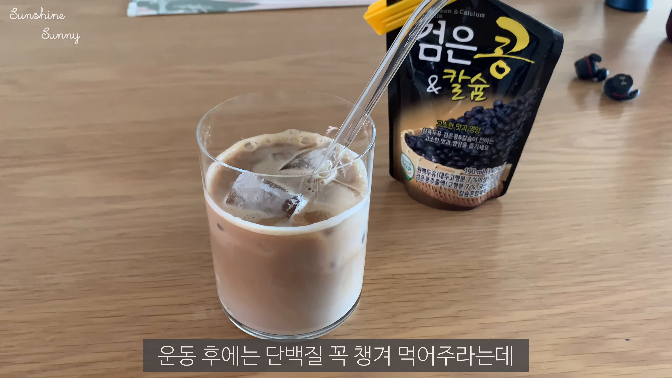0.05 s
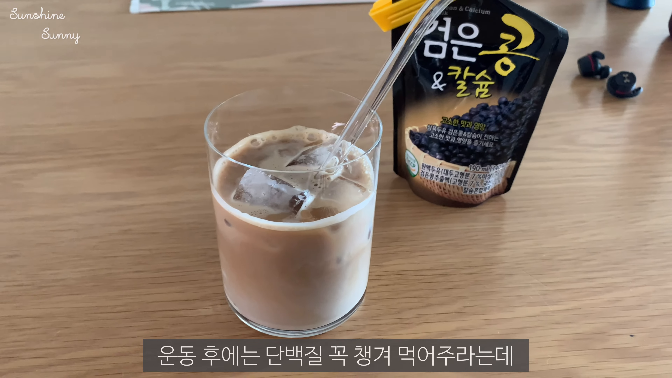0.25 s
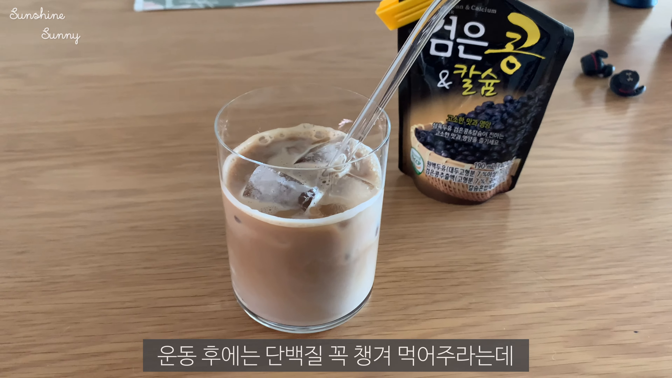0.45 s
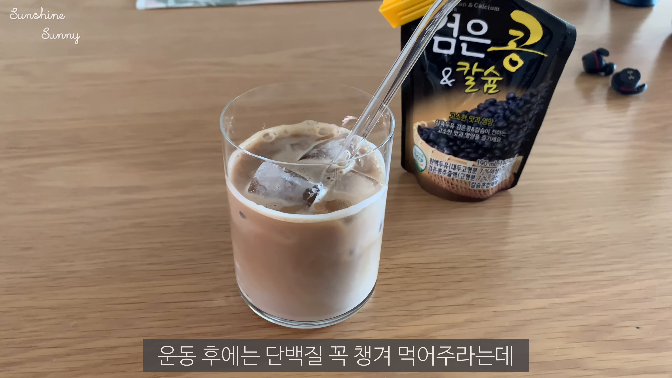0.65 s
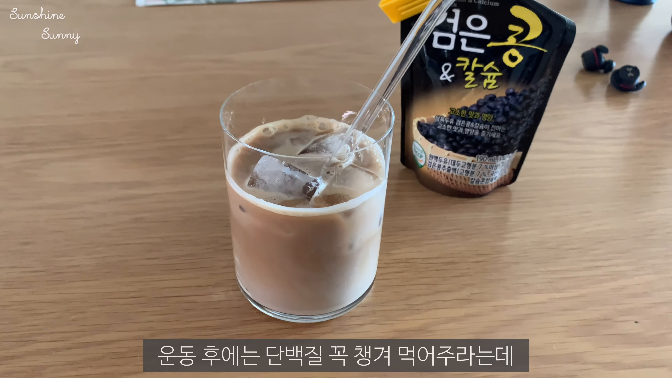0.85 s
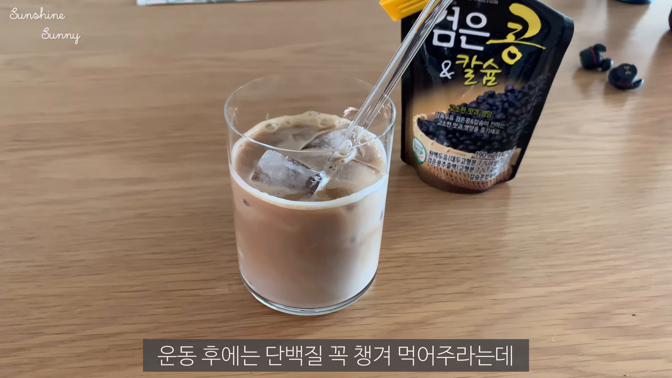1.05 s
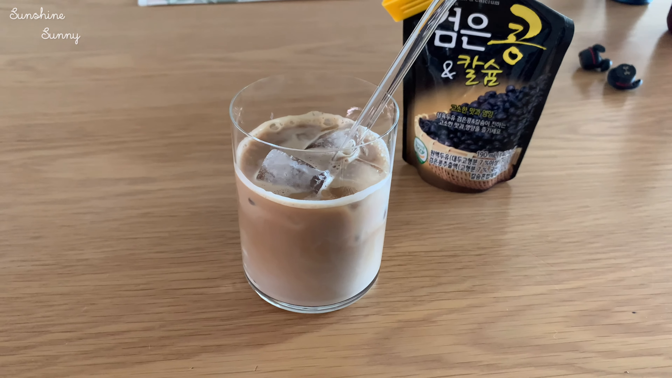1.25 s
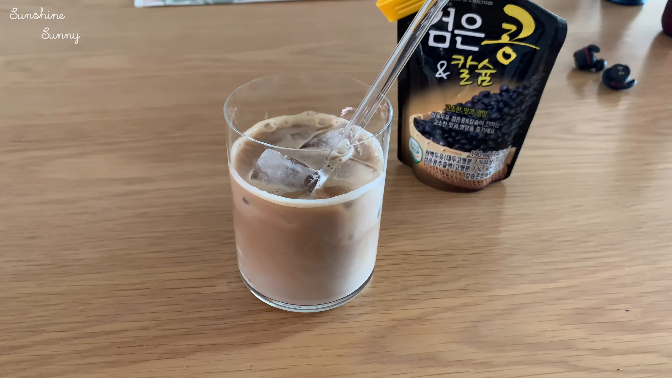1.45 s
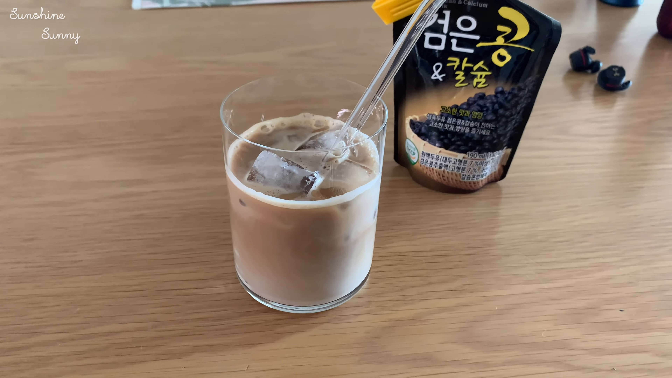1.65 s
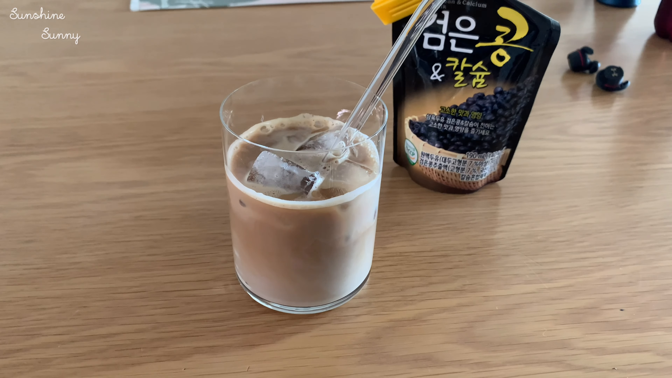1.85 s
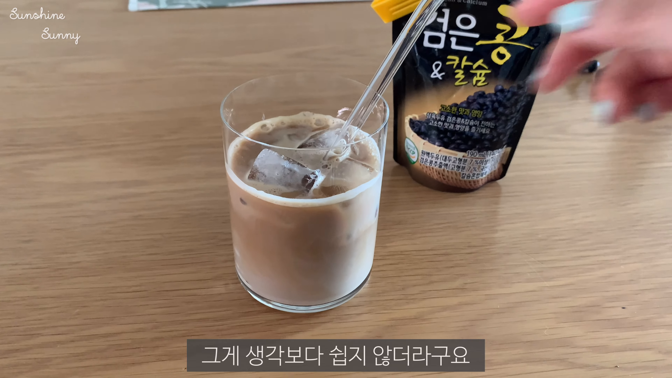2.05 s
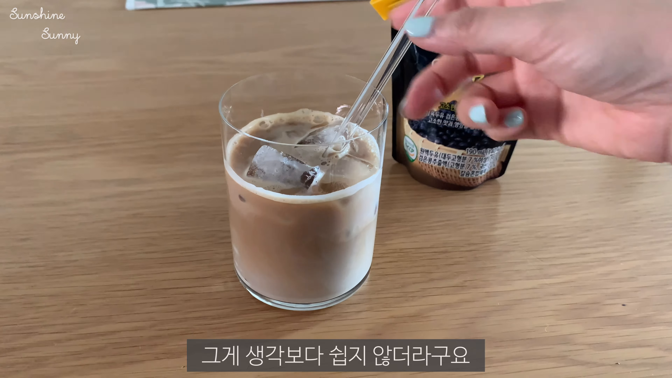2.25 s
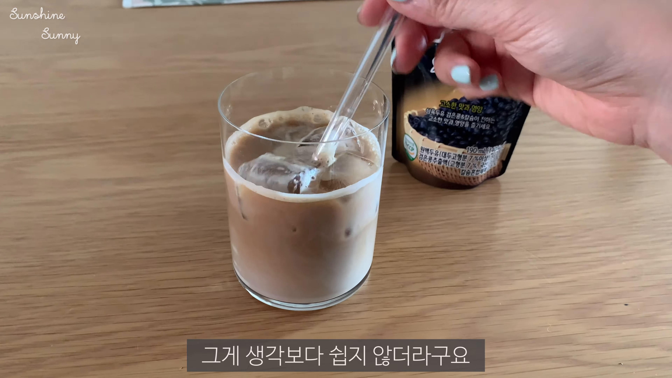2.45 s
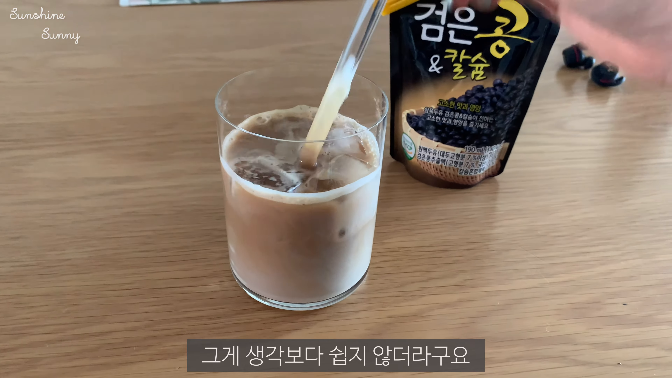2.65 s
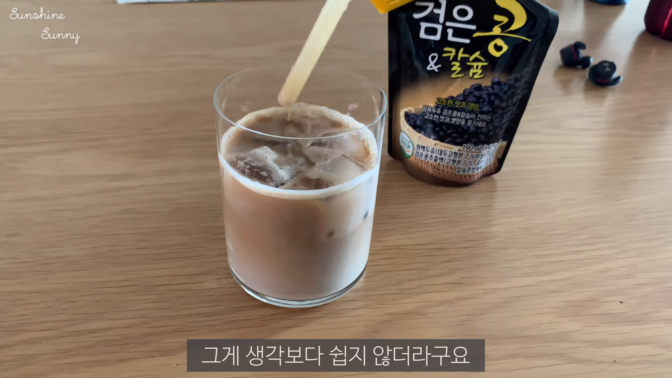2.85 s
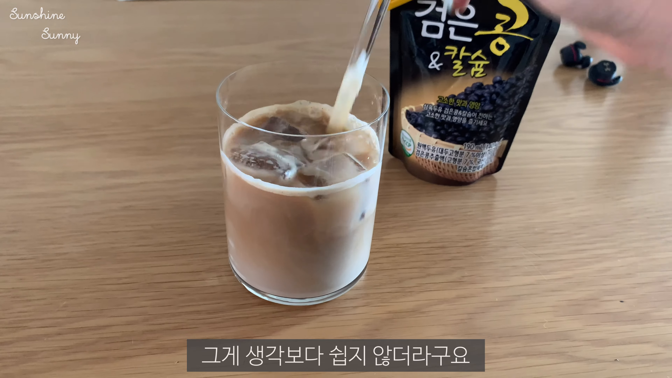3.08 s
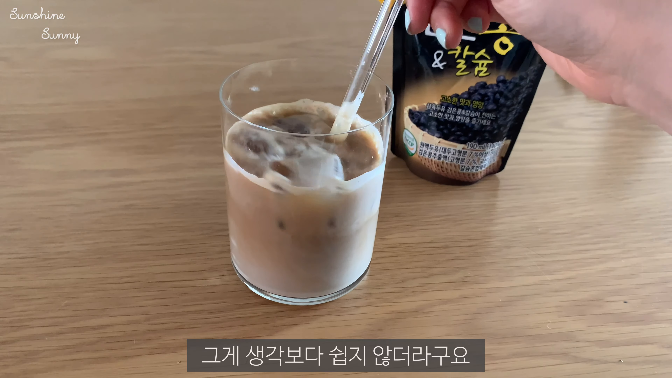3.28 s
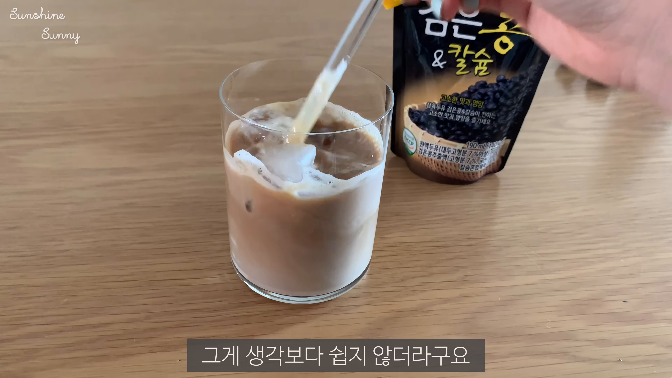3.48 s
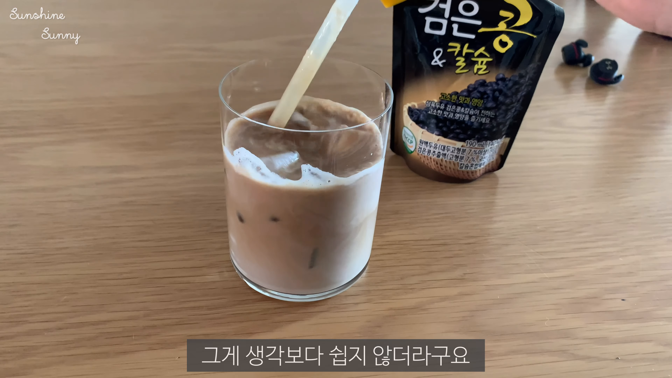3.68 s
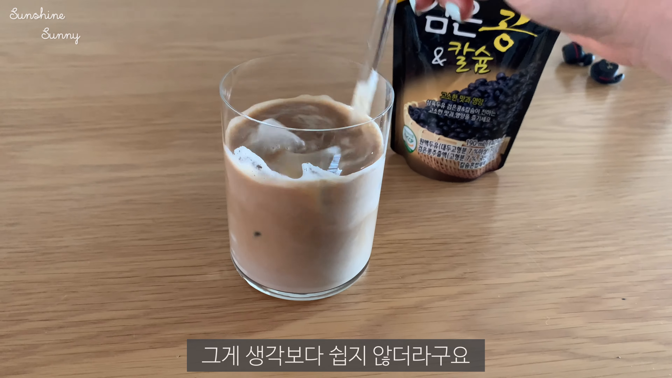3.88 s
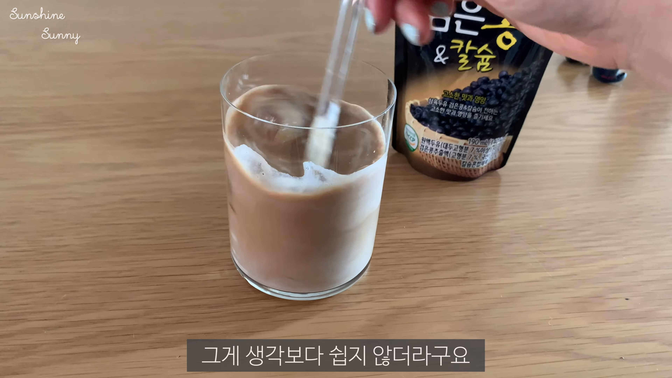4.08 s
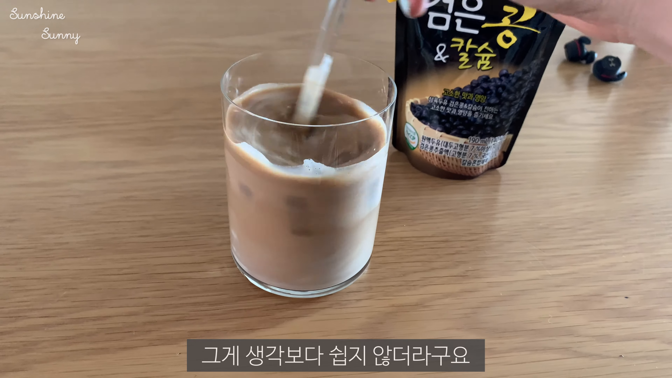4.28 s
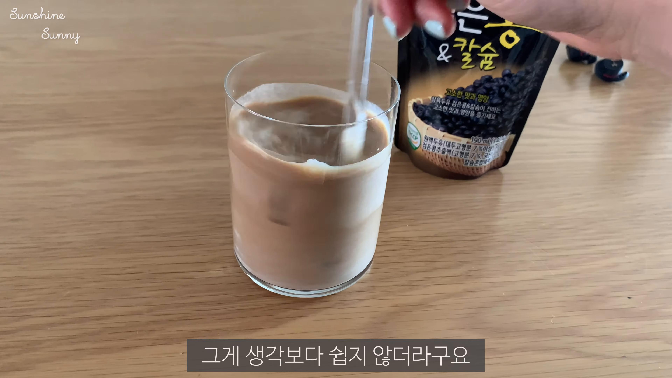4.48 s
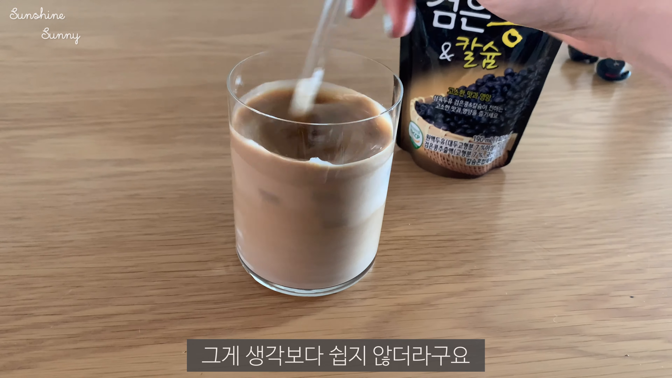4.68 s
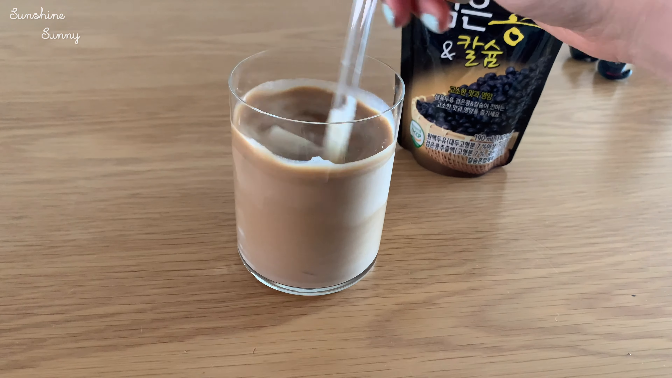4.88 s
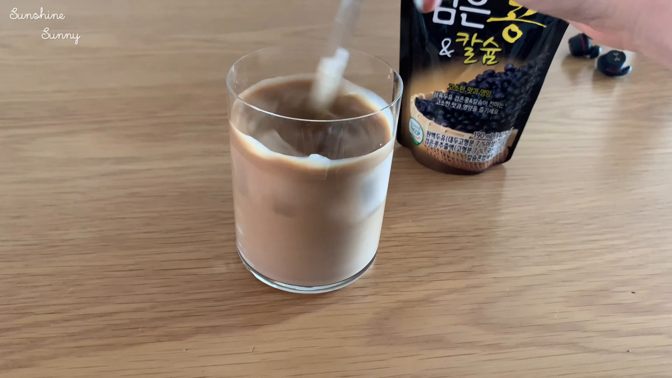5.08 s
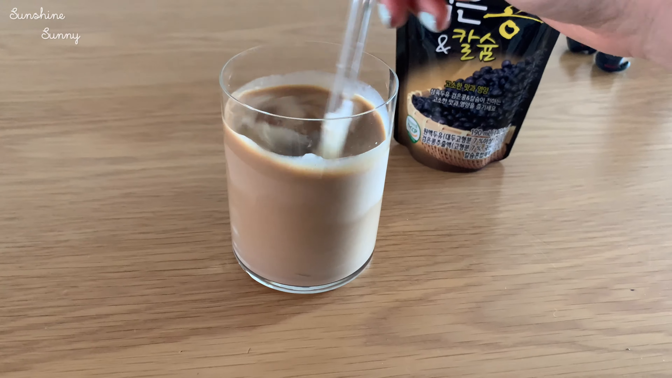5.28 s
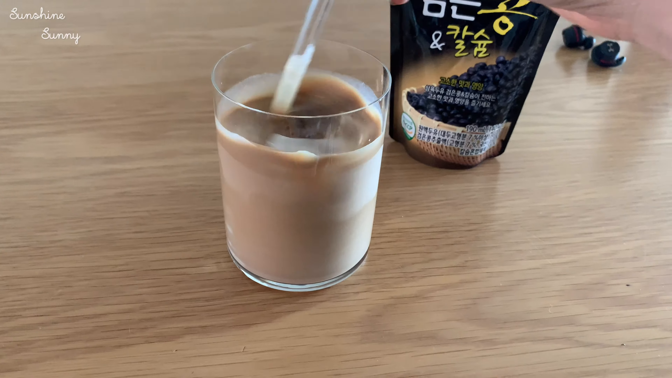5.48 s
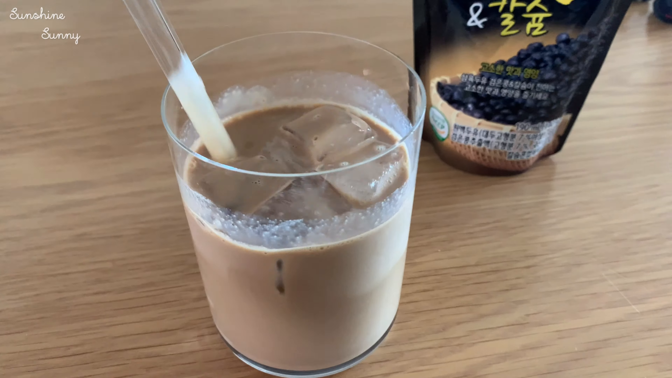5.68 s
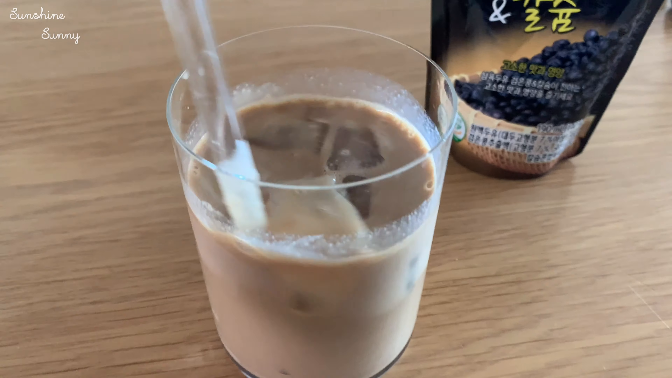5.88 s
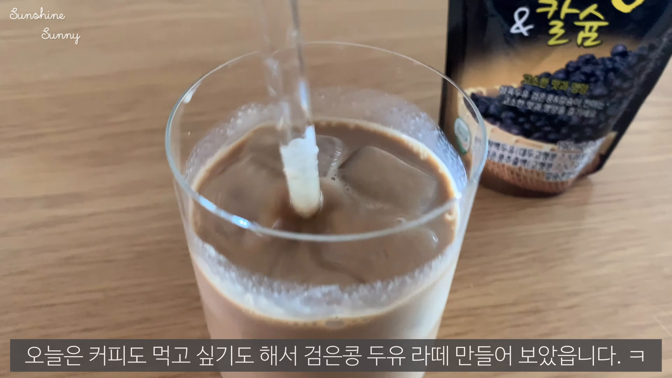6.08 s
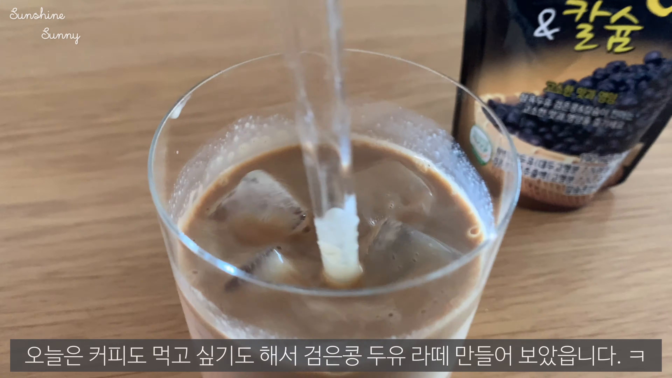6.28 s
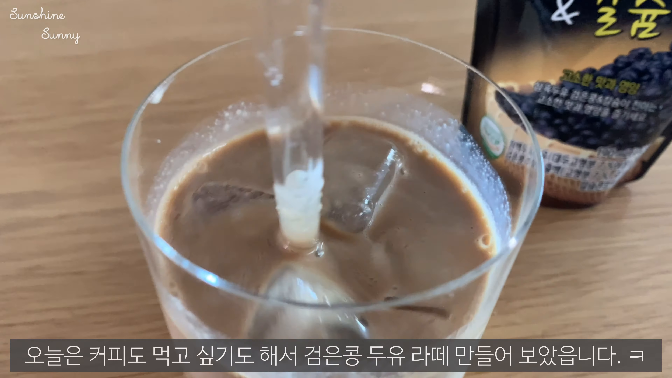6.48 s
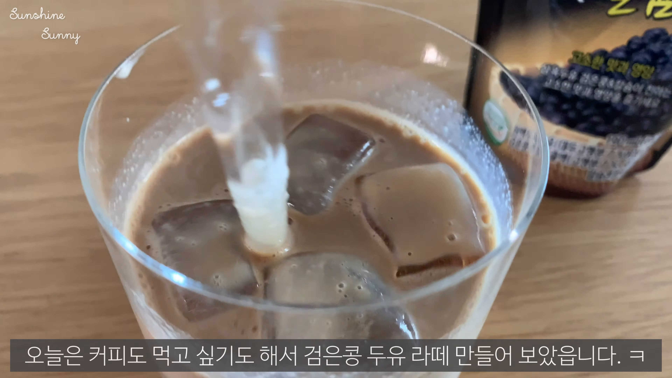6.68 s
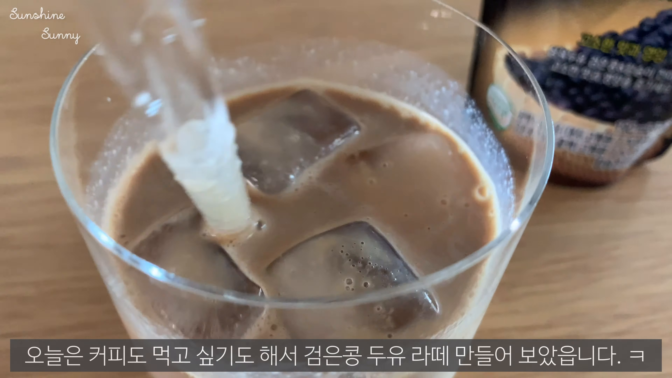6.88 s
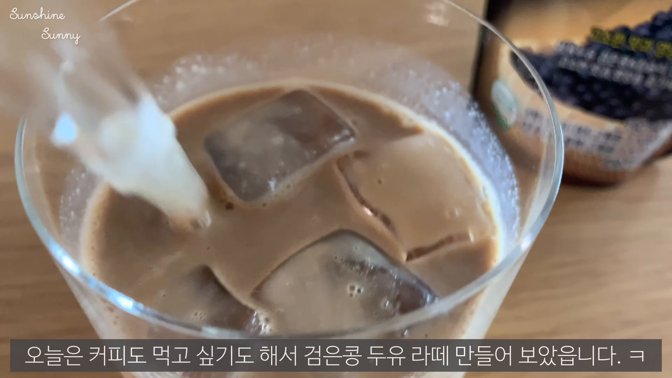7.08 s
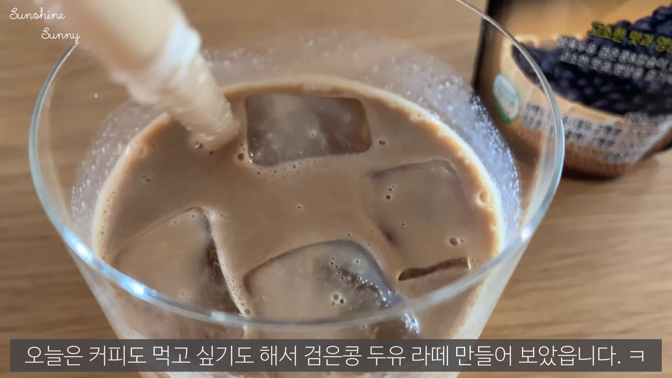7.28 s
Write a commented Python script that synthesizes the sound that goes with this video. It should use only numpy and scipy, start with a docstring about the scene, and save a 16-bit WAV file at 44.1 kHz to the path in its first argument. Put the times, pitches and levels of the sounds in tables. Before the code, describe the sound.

Ice cubes clack and rattle against a thin glass tumbler of iced milk coffee as a glass straw stirs it, after two quiet seconds.

```python
"""Ice cubes in stirred milk coffee clack against each other and a thin tumbler: short damped modes and a crack.
The full glass answers with low damped tones, shoves sound the wooden table, the glass straw rings on.
The drink washes (coloured noise), ticks and gulps (sliding damped sines).
A hand-held stereo microphone hears it close by, with soft hand bumps, kitchen reflections and a low hum."""
import sys
import numpy as np
from scipy import signal
from scipy.fft import rfft, irfft
from scipy.io import wavfile

SR = 44100
rng = np.random.default_rng(int(sys.argv[2]) if len(sys.argv) > 2 else 0)


def transcribe(signal):
    """Save signal, clipped to [-1, 1], as a 16-bit WAV file at the path in sys.argv[1]."""
    frames = np.atleast_2d(signal).T
    limited = np.clip(frames, -1, 1)
    pcm = np.round(limited * 32767).astype(np.int16)
    wavfile.write(sys.argv[1], SR, pcm)


N = 323694
TIME = np.arange(N) / SR

# contacts of ice, straw and glass: t/s, strength/dB, hardness/dB (>0 corner, <0 wet face), clack f/Hz
CONTACTS = [(2.2864, -47.5, 4, 4710), (2.304, -48, 0, 4860), (2.3345, -53, 2, 4730),
            (2.3908, -56.5, -2.5, 4680), (2.4643, -42.5, 2.5, 4540), (2.532, -43.5, 1.5, 4440),
            (2.597, -42.5, 0.5, 4140), (2.828, -52.5, -0.5, 3860), (2.9238, -44.5, 0, 4060),
            (2.9478, -45.5, -4, 4180), (3.053, -37, 7.5, 4400), (3.1481, -21, 6.5, 5020),
            (3.2384, -27, 2, 2335), (3.2507, -30, 0, 2500), (3.272, -43.5, 9, 4470),
            (3.283, -42, 0.5, 4400), (3.332, -45.5, 6.5, 4530), (3.3897, -28.5, 2, 4520),
            (3.4222, -29.5, -1.5, 4240), (3.4347, -30.5, 13, 4140), (3.546, -40.5, 7, 2890),
            (3.689, -42.5, 4, 4800), (3.75, -25, 11, 3850), (3.7595, -29.5, 10, 5320),
            (3.8176, -42.5, 3, 4230), (3.8336, -36, 2.5, 4160), (3.905, -42, -4, 5250),
            (3.9562, -39.5, -8, 2180), (3.965, -37.5, -3.5, 2840), (4.045, -39, -4, 4820),
            (4.085, -34.5, 0, 2390), (4.1391, -44, -2.5, 2980), (4.1937, -44.5, -2, 3670),
            (4.266, -44, -6, 2200), (4.3301, -29, 6.5, 3030), (4.3471, -28, 9, 4490),
            (4.3926, -37, -1.5, 2440), (4.4135, -35, 2, 4940), (4.4273, -34, -5, 3640),
            (4.5536, -48.5, -6, 2430), (4.632, -46, -2, 4560), (4.712, -45, -4, 2550),
            (4.7482, -26, -2.5, 3300), (4.81, -32, -5.5, 2620), (4.821, -25.5, 6, 3680),
            (4.8392, -30.5, -2, 3520), (4.848, -34, -0.5, 4730), (4.865, -43, -0.5, 3410),
            (4.946, -38, -4, 4770), (4.959, -42, -4, 3260), (4.9911, -38, -3.5, 4530),
            (5.0729, -20, 6.5, 3400), (5.1045, -33, 12.5, 4880), (5.1868, -30, -4, 2500),
            (5.2264, -29.5, 9.5, 5200), (5.2408, -33.5, 7.5, 5000), (5.3385, -33.5, 0.5, 4430),
            (5.3701, -30.5, -1.5, 4600), (5.4551, -41, 0, 4830), (5.547, -41, 3.5, 3640),
            (5.6352, -38.5, 6.5, 4300), (5.7359, -39, -2, 4600), (5.7963, -43, 0, 6230),
            (5.8329, -35, 11, 5360), (5.9698, -55, -5, 3960), (6.092, -30.5, 4, 3490),
            (6.1142, -36.5, 1, 3380), (6.1524, -33.5, -4.5, 3230), (6.1657, -36.5, 0, 3180),
            (6.201, -26, 2, 4800), (6.3066, -31.5, 1, 3070), (6.3599, -37, 1, 4440),
            (6.4435, -44, -1, 3000), (6.4712, -36.5, -1, 3124), (6.5233, -46.5, 2.5, 3120),
            (6.5909, -56.5, -0.5, 3070), (6.6418, -50.5, -4, 2810), (6.6745, -57.5, -2, 2440),
            (6.77, -50, -3, 2800), (6.8438, -55, -2.5, 3040), (6.89, -52.5, -4.5, 2530),
            (6.9873, -55.5, -4.5, 2740), (7.0907, -56, 0, 2810), (7.159, -34, 4.5, 3355),
            (7.256, -50, -4.5, 2860), (7.3007, -48.5, 5.5, 4230)]
# low modes of the filled tumbler: f/Hz, level/dB, t60/s
TUMBLER_MODES = [(509.8, 2.5, 0.24), (644.6, 1.5, 0.22), (686.7, 0.5, 0.22), (799.5, -2.5, 0.13)]

# answers to a contact: level/dB at USUAL_DB and hardness 0, dB per dB of strength, dB per dB of hardness
CUBE_LAW, CRACK_LAW, KNOCK_LAW, HOLLOW_LAW = (-34, 1.0, 0.088), (-41.5, 1.03, 1), (-35.5, 0.98, -1.4), (-40.5, 0.62, -0.61)
USUAL_DB = -35  # strength of an ordinary contact
LEAD_S = 0.012  # grazing time ahead of the main touch


def from_db(db):
    """Amplitude gain."""
    return 10 ** (np.asarray(db) / 20)


def rms_one(x):
    """Scales to rms 1."""
    return x / np.sqrt(np.mean(x ** 2) + 1e-20)


def unit_blow(x):
    """Scales a stereo sound to the energy of 10 ms at rms 1."""
    return x / np.sqrt(np.sum(x ** 2) / 2 / (SR / 100) + 1e-20)


def curve(rows, s):
    """Interpolates (t/s, value) rows."""
    return np.interp(s, *np.transpose(rows))


def curves(rows, s):
    """Interpolates every column after t/s."""
    when, *columns = np.transpose(rows)
    return [np.interp(s, when, column) for column in columns]


def filtered(x, hz, kind, order=2):
    """Butterworth filter."""
    sos = signal.butter(order, np.minimum(hz, 0.45 * SR), kind, fs=SR, output="sos")
    return signal.sosfilt(sos, x)


def slow(hz):
    """Low-passed noise of rms 1, past its start-up."""
    return rms_one(filtered(rng.normal(size=N + SR), hz, "low")[SR:])


def strata(count):
    """One random position in each of count equal steps of 0..1."""
    return (np.arange(count) + rng.random(count)) / count


def coloured_noise(spectrum):
    """Stereo noise of rms 1, alike at both ports in the bass."""
    hz = np.maximum(np.fft.rfftfreq(N, 1 / SR), 1)
    points_hz, points_db = np.transpose(spectrum)
    gain = from_db(np.interp(np.log(hz), np.log(points_hz), points_db))
    mid, side = rfft(rng.normal(size=(2, N))) * gain
    return rms_one(irfft(mid + side * hz / (hz + 400) * [[1], [-1]], N))


def add(out, s, sound):
    """Places a stereo sound; it reaches the right port a little later."""
    # microphone moves in over the rim: t/s, lag of the right port/ms
    port_lag = [(5.4, .135), (6.0, .31)]
    for channel, lag_s in enumerate([0, curve(port_lag, s) / 1000]):
        start = int((s + lag_s) * SR)
        part = sound[channel, :max(N - start, 0)]
        out[channel, start:start + len(part)] += part


def mixed(parts):
    """Sums short stereo sounds given as (delay s, gain, sound)."""
    starts = [int(s * SR) for s, _, _ in parts]
    length = max(start + part[2].shape[1] for start, part in zip(starts, parts))
    out = np.zeros((2, length))
    for start, (_, gain, sound) in zip(starts, parts):
        out[:, start:start + sound.shape[1]] += gain * sound
    return out


def ring(hz, db, t60, vary_db, apart):
    """Damped sines, reweighted each blow; each port hears its own strengths and phases."""
    hz, db, t60 = np.atleast_1d(hz, db, t60)
    t = TIME[:int(np.max(t60) * SR)]
    gain = from_db(db + vary_db * rng.normal(size=len(hz))) * rng.choice([-1, 1], len(hz))
    log_strength = 0.5 * rng.normal(size=(2, len(hz)))
    phase = rng.normal(size=(2, len(hz)))
    ports = gain * np.exp(apart * (log_strength + 1j * phase))
    waves = np.exp(np.outer(2j * np.pi * hz - np.log(1000) / t60, t))
    onset = 1 - np.exp(-np.outer(2 * np.pi * hz, t))
    return unit_blow((ports @ (waves * onset)).imag)


def cluster(hz, octaves, t60, falloff_db, count, apart):
    """Damped modes scattered round a pitch, weaker the farther off they lie."""
    offset = strata(count) * 2 - 1
    mode_hz = hz * 2 ** (octaves * offset)
    return ring(mode_hz, -falloff_db * abs(offset), np.full(count, t60), vary_db=1.0, apart=apart)


def blips(rows, glide):
    """Single damped tones whose pitch slides up as they die."""
    out = np.zeros((2, N))
    for s, hz, db, t60 in rows:
        t = TIME[:int(t60 * SR)]
        tone = np.sin(2 * np.pi * hz * t * (1 + glide * t / t60))
        tone = tone * from_db(-60 * t / t60) * (1 - np.exp(-4 * hz * t))
        add(out, s, from_db(db) * unit_blow(np.array([tone, tone])))
    return out


def background(air_db=-64, hum_hz=56.9, hum_start_db=-58.5, hum_rise_db=2.9, waver=0.32, swell_db=2):
    """A wavering hum, rising from 2.5 to 3.5 s, and dull room air whose rumble swells slowly."""
    # quiet of the kitchen: f/Hz, level/dB per Hz
    air_spectrum = [(25, -19), (60, 5.5), (95, -2), (170, -1.5), (400, -14), (700, -18), (1000, -27.5),
                    (2500, -37), (8000, -42.5), (10500, -36.5), (14000, -47), (15000, -57.5)]
    air = coloured_noise(air_spectrum)
    rumble = filtered(air, 590, "low", order=1)
    air = air + (from_db(swell_db * slow(0.56)) - 1) * rumble
    hum = np.sin(2 * np.pi * hum_hz * TIME + waver * slow(3.6))
    hum = rms_one((1 + waver * slow(9.7)) * hum)
    hum_db = hum_start_db + hum_rise_db * np.clip(TIME - 2.5, 0, 1)
    return from_db(air_db) * air + from_db(hum_db) * hum


def bumps(octaves=0.7, falloff_db=9):
    """The hand shifts on the microphone: dull thuds that swell over a few cycles, without a clear pitch."""
    # soft bumps: t/s, f/Hz, level/dB, t60/s
    bump_rows = [(.6, 206, -49.5, 0.24), (0.679, 135.5, -49, 0.58), (1.13, 228.5, -55, .25),
                 (1.186, 82, -39, 0.08), (1.255, 69.6, -48, 0.055), (5.863, 66.4, -35, 0.16),
                 (6.569, 67.5, -44.5, 0.27)]
    out = np.zeros((2, N))
    for s, hz, db, t60 in bump_rows:
        thud = cluster(hz, octaves, t60, falloff_db, count=7, apart=0.091)
        swell = 1 - np.exp(-TIME[:thud.shape[1]] * hz / 10)
        add(out, s, from_db(db) * unit_blow(thud * swell))
    return out


def kitchen(x, t60=0.18, treble_t60=0.35, early_db=-12, early_t60=0.01, tail_db=-12, treble_db=-17):
    """Quick reflections from the table top and things on it, then the tail of a small room."""
    t = TIME[:SR // 2]

    def echoes(band_hz, decay_s):
        """Decaying noise after a 3 ms gap, in one band."""
        noise = rng.normal(size=(2, len(t))) * from_db(-60 * t / decay_s) * (t > 0.003)
        return filtered(noise / np.sqrt(np.sum(noise ** 2) / 2), band_hz, "band")

    response = (from_db(early_db) * echoes([500, 12000], early_t60)
                + from_db(tail_db) * echoes([120, 5500], t60)
                + from_db(treble_db) * echoes([5500, 12000], treble_t60))
    return signal.fftconvolve(x, response, axes=1)[:, :N]


def gurgle(start_s, length_s=0.12, low_hz=170, high_hz=380, db=-51.0, t60=0.059, count=12):
    """A gulp breaks into a short run of small air pockets."""
    when, pitch = rng.random((2, count))
    hz = low_hz * (high_hz / low_hz) ** pitch
    return blips([(start_s + length_s * w, f, db, t60) for w, f in zip(when, hz)], glide=0.055)


def gulps():
    """Air pockets in the drink sound as sliding damped tones; the first one gurgles."""
    # air pockets: t/s, f/Hz, level/dB, t60/s
    pockets = [(4.197, 166, -36, 0.12), (4.232, 312, -47.5, 0.056), (4.275, 189, -39.5, 0.14),
               (7.052, 418, -33, 0.022)]
    return blips(pockets, glide=0.027) + gurgle(pockets[0][0])


def answer(law, db, hardness):
    """Gain: strong, hard contacts are brief and feed the treble; soft ones push the wall and whole glass."""
    usual_db, per_strength, per_hardness = law
    return from_db(usual_db + per_strength * (db - USUAL_DB) + per_hardness * hardness)


def inside_glass(sound, bounce_s=0.00035, apart=0.2):
    """Sound bounces across the tumbler for a millisecond or two on its way out, equally loud at both ports."""
    t = TIME[:SR // 300]
    paths = rng.normal(size=len(t)) + apart * rng.normal(size=(2, len(t)))
    out = signal.fftconvolve(sound, paths * t * np.exp(-t / bounce_s), axes=1)
    return unit_blow(out / out.std(axis=1, keepdims=True))


def cube(hz, others_db, t60=0.019, detune=0.025):
    """A cube clacks with one leading pitch and wakes the upper modes of the wall, differently at each spot."""
    # upper modes of the glass wall: f/Hz, level/dB
    wall_modes = [(3100, 1), (3400, 3.5), (4020, 1.5), (4560, 5), (4950, -1), (6500, -7)]
    wall_hz, wall_db = np.transpose(wall_modes)
    wall_hz = wall_hz * (1 + detune * rng.normal(size=len(wall_hz)))
    wall = inside_glass(ring(wall_hz, wall_db, np.full(len(wall_hz), t60), vary_db=6.5, apart=0.56))
    lead = cluster(hz, octaves=0.11, t60=0.011, falloff_db=8, count=3, apart=0.72)
    return unit_blow(mixed([(0, 0.86, lead), (0, from_db(others_db), wall)]))


def crack(s, octaves=0.75, low_ratio=0.66, high_ratio=1.21):
    """The hard instant of contact: many high modes that die at once."""
    # duller from over the rim: t/s, centre f/Hz
    crack_pitch = [(3.3, 10830), (6.2, 9240)]
    hz = curve(crack_pitch, s)
    high = cluster(hz, octaves, t60=0.0067, falloff_db=1.0, count=24, apart=0.78)
    return unit_blow(filtered(inside_glass(high), [hz * low_ratio, hz * high_ratio], "band"))


def knock(s):
    """The wall, damped by the drink, gives a short knock; the longer it rings, the purer its pitch."""
    # shifts with the drink, rings longer as the stirring eases: t/s, f/Hz, t60/s
    knock_pitch = [(2.5, 1830, 0.042), (3.3, 1519, 0.045), (3.95, 1950, 0.034), (4.45, 1712, .044),
                   (5.2, 1598, .055), (5.701, 1363, 0.098)]
    hz, t60 = curves(knock_pitch, s)
    wall = cluster(hz, octaves=0.0241 / t60, t60=t60, falloff_db=8.0, count=6, apart=0.58)
    return unit_blow(filtered(wall, [900, 3000], "band"))


def touch(s, db, hardness, hz, side_modes_db=-0.5, spread_per_db=0.27):
    """Gains and sounds of clack, crack and knock; stronger blows wake more of the wall's upper modes."""
    clack = cube(hz, others_db=side_modes_db + spread_per_db * (db - USUAL_DB))
    parts = [(CUBE_LAW, clack), (CRACK_LAW, crack(s)), (KNOCK_LAW, knock(s))]
    return [(answer(law, db, hardness), sound) for law, sound in parts]


def unrest(stir_start_s=2.29, upset_db=-8.5, calm_t60_s=0.34):
    """How much the drink moves: the circling straw plus the dying upset of every knock on the wall."""
    # stirring effort: t/s, level/dB
    stir = [(2.4, -58.5), (2.72, -56), (2.78, -68.5), (3.1, -54.5), (3.3, -42.5), (3.65, -49.5), (4.1, -51),
            (4.28, -69), (4.4, -52), (4.98, -42), (5.7, -54), (6.04, -60), (6.7, -68.5)]
    power = from_db(curve(stir, TIME)) ** 2 * (TIME > stir_start_s)
    upsets = np.zeros(N)
    for s, db, hardness, _ in CONTACTS:
        upsets[int(s * SR)] = (from_db(upset_db) * answer(KNOCK_LAW, db, hardness)) ** 2
    power_decay = from_db(-60 / (calm_t60_s * SR)) ** 2  # per sample
    return np.sqrt(power + signal.lfilter([1], [1, -power_decay], upsets))


def jostling(per_s=130, busy_db=-47, tick_db=-9.5, spread_db=5, hardness_db=-3.5, hardness_spread_db=3,
             wash_db=-6.0):
    """The drink washes along the wall; the faster it moves, the more often the floating cubes tick together."""
    # colour of the swirling drink: f/Hz, level/dB per Hz
    wash_spectrum = [(100, -4), (430, 2), (510, 6.5), (570, -9), (670, -5), (900, -1.5), (1700, -2.5),
                     (3000, -13.5), (12000, -34.5)]
    out, motion = np.zeros((2, N)), unrest()
    # 150 candidate ticks per s, kept at a rate that follows the motion up to per_s
    low, high = [0, 0, -1, -1, 0], [TIME[-1], 150, 1, 1, len(CONTACTS)]
    candidates = rng.uniform(low, high, (int(150 * TIME[-1]), 5))
    for s, chance, size, corner, which in candidates:
        moving = motion[int(s * SR)]
        if chance < per_s * min(moving / from_db(busy_db), 1):
            db = 20 * np.log10(moving) + tick_db + spread_db * size
            hardness = hardness_db + hardness_spread_db * corner
            for gain, sound in touch(s, db, hardness, CONTACTS[int(which)][3]):
                add(out, s, gain * sound)
    wash_gain = from_db(wash_db + 2.0 * slow(65))
    return out + coloured_noise(wash_spectrum) * motion * wash_gain


def tumbler(favoured_hz, off_mode_db=-21.5, wander_octaves=0.11, slosh=0.0424, ripple=0.38, ripple_hz=28,
            swell_s=0.003):
    """The moving drink loads the wall: low modes shift and trade places per blow, swell briefly and flutter."""
    hz, db, t60 = np.transpose(TUMBLER_MODES)
    off_octaves = abs(np.log2(hz / favoured_hz) + wander_octaves * rng.normal())
    db = db + off_mode_db * off_octaves
    shifted_hz = hz * (1 + slosh * rng.uniform(-0.76, 1, len(hz)))
    tone = ring(shifted_hz, db, t60, vary_db=5.0, apart=0.35)
    t = TIME[:tone.shape[1]]
    flutter = np.interp(t * 2 * ripple_hz, np.arange(100), rng.normal(size=100))
    return unit_blow(tone * (1 + ripple * flutter) * (1 - np.exp(-t / swell_s)))


def tings(out):
    """The straw rings on as a damped sine when it bounces free."""
    # straw: t/s, f/Hz, level/dB, t60/s
    ting_rows = [(2.287, 4660, -51.5, .35), (2.465, 4640, -50.5, .3), (2.828, 4125, -60, .12),
                 (2.925, 4160, -52, .19), (3.053, 4720, -48, .16), (3.149, 12500, -29, .07),
                 (5.636, 4680, -49, .13)]
    for s, hz, db, t60 in ting_rows:
        add(out, s, from_db(db) * ring(hz, 0, t60, vary_db=0, apart=0.087))


def crash(s, length_s=0.02, fade_db=-9, hardness_db=-5.5, count=6):
    """The cubes pile into each other in a quick, dying run, each with a clack pitch drawn at random."""
    steps = strata(count)
    pitches = rng.choice(np.transpose(CONTACTS)[3], count)
    parts = []
    for step, hz in zip(steps, pitches):
        for gain, sound in touch(s, USUAL_DB, hardness_db, hz):
            parts.append((length_s * step, gain * from_db(fade_db * step), sound))
    return unit_blow(mixed(parts))


def shoves(out, ring_db=-0.5, crash_db=-3):
    """Hard shoves go through the base into the table, flex the tumbler and throw the cubes together."""
    # shoves: t/s, level/dB
    shove_rows = [(2.925, -39), (3.15, -23.5), (4.426, -40.5), (4.75, -32), (5.189, -33)]
    # modes of the table: f/Hz, level/dB, t60/s
    table_modes = [(145.7, -9, 0.33), (206.6, -9.5, 0.16), (314, 0, 0.14), (430, 1.5, 0.19),
                   (811, -5.5, 0.18)]
    for s, db in shove_rows:
        add(out, s, from_db(db) * ring(*np.transpose(table_modes), vary_db=1, apart=0.038))
        add(out, s, from_db(db + ring_db) * tumbler(TUMBLER_MODES[0][0]))
        add(out, s, from_db(db + crash_db) * crash(s))


def rub(length_s, favoured_hz, count=7):
    """A dragged cube slips in uneven steps, each of which nudges the tumbler."""
    slips_s = length_s * strata(count)
    return unit_blow(mixed([(s, 1, tumbler(favoured_hz)) for s in slips_s]))


def rubs(out):
    """Cubes dragged along the wall set the tumbler humming."""
    # rubs: t/s, length/s, level/dB, favoured f/Hz
    rub_rows = [(3.455, .045, -34.5, 695), (3.522, .02, -38, 710), (4.995, 0.04, -29.5, 560)]
    for s, length_s, db, hz in rub_rows:
        add(out, s, from_db(db) * rub(length_s, hz))


def chatter(sound, hardness, graze_db=-19, bounce_db=-13, smear=0.49, settle_s=0.016, count=12):
    """Wet ice grazes before it catches at LEAD_S, then bounces, the more so the flatter it lands."""
    touches = np.zeros(SR // 10)
    before_s = LEAD_S * rng.random(count) ** 2
    after_s = np.minimum(0.0027 + rng.exponential(settle_s, count), 0.07)
    grazes = from_db(graze_db) * rng.uniform(-0.92, 1, count) * (1 - before_s / LEAD_S)
    bounces = from_db(bounce_db - smear * hardness) * rng.uniform(-0.42, 1, count)
    touches[((LEAD_S - before_s) * SR).astype(int)] = grazes
    touches[((LEAD_S + after_s) * SR).astype(int)] = bounces * np.exp(-after_s / settle_s / 2)
    touches[int(LEAD_S * SR)] = 1
    return unit_blow(signal.fftconvolve(sound, touches[None], axes=1))


def contacts():
    """Every contact sounds the cube, the wall and the whole tumbler; rubs, shoves and straw join in."""
    # drink climbing the wall picks the low mode and how freely it rings: t/s, favoured f/Hz, gain/dB
    swirl = [(2.3, 647, -0.5), (2.95, 590, 3), (3.45, 684, 5), (4.4, 579, -5.5), (5.5, 552, -0.5),
             (6.199, 701.3, 2.5), (7.2, 709, -1)]
    out = np.zeros((2, N))
    for s, db, hardness, hz in CONTACTS:
        for gain, sound in touch(s, db, hardness, hz):
            add(out, s - LEAD_S, gain * chatter(sound, hardness))
        favoured_hz, free_db = curves(swirl, s)
        add(out, s, from_db(free_db) * answer(HOLLOW_LAW, db, hardness) * tumbler(favoured_hz))
    rubs(out)
    shoves(out)
    tings(out)
    return out


def scene():
    """Glass, ice and drink with their reflections, over hand bumps and room background."""
    drink = contacts() + jostling() + gulps()
    return drink + kitchen(drink) + bumps() + background()


def record(dry):
    """Clips peaks at 0.95 of full scale, then cuts the top steeply above about 16 kHz."""
    low_pass = signal.cheby2(14, 60, 16900, fs=SR, output="sos")  # 60 dB down from 16.9 kHz
    return signal.sosfilt(low_pass, np.clip(dry, -0.95, 0.95))


dry = scene()
out = record(dry)
transcribe(out)
```